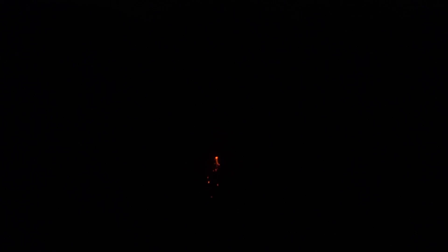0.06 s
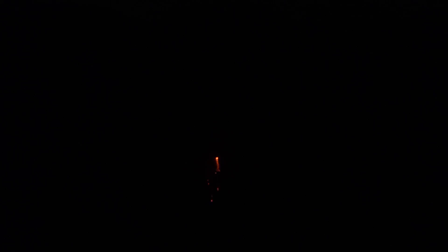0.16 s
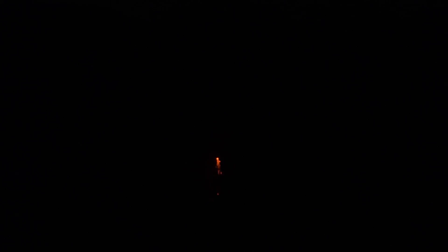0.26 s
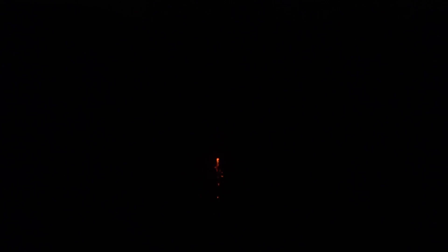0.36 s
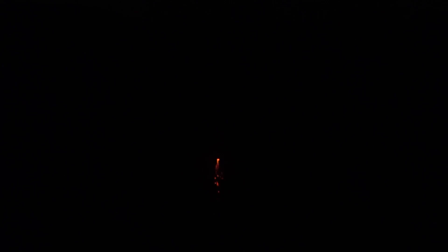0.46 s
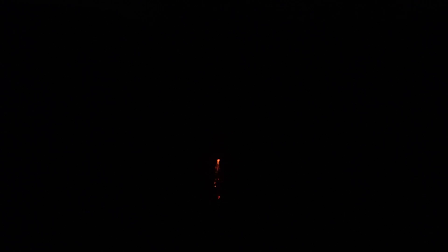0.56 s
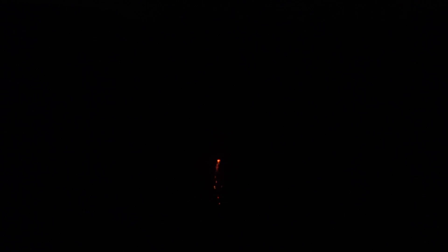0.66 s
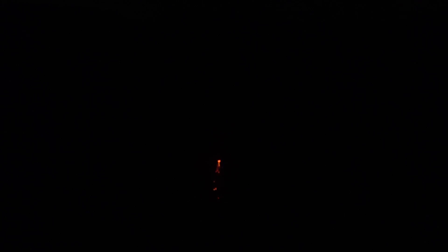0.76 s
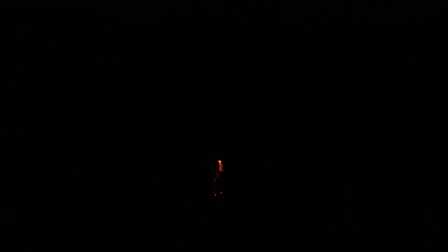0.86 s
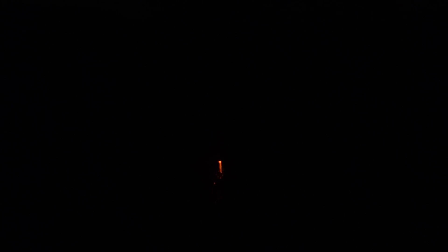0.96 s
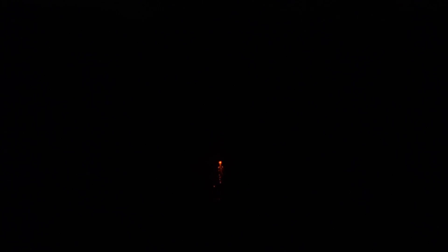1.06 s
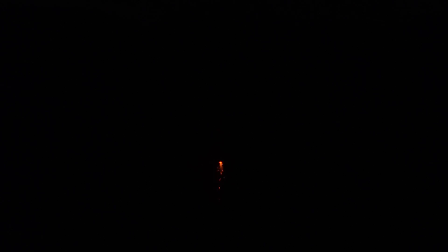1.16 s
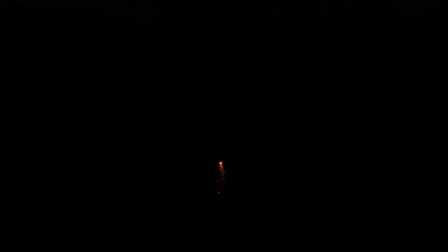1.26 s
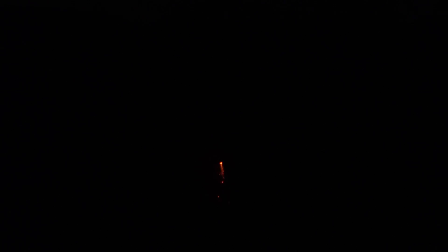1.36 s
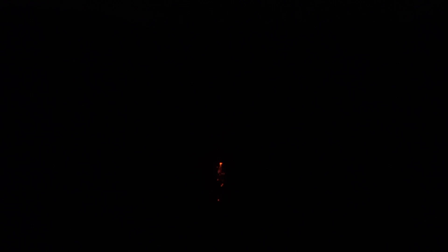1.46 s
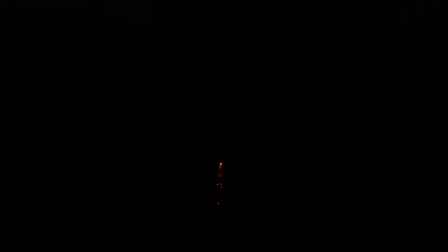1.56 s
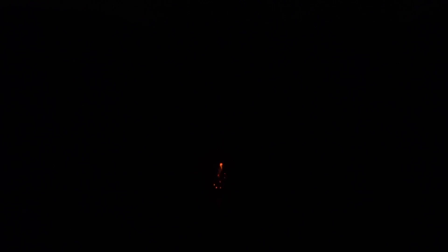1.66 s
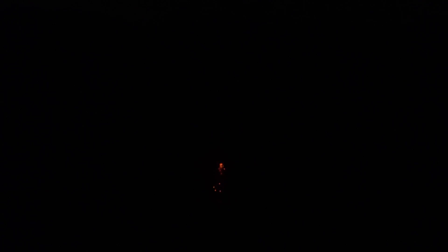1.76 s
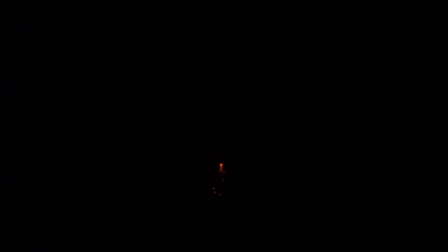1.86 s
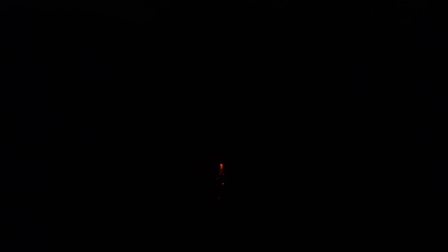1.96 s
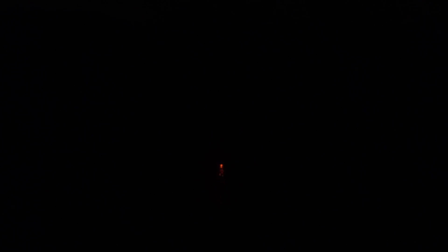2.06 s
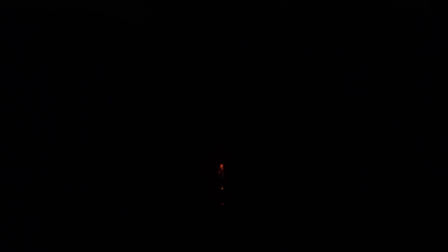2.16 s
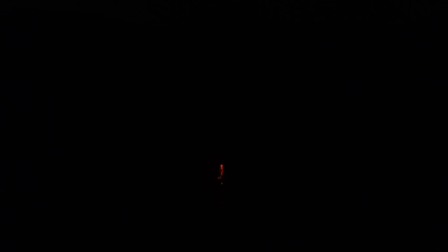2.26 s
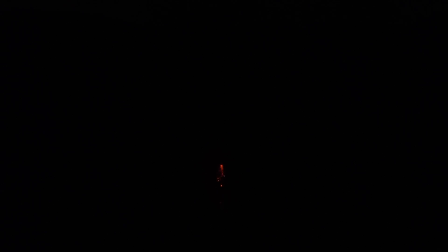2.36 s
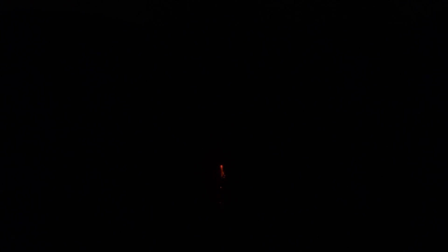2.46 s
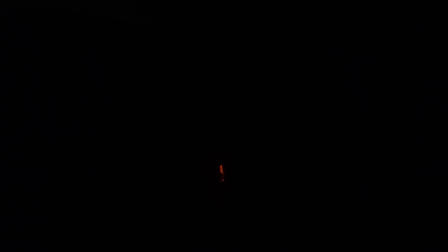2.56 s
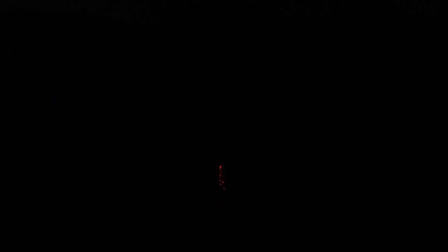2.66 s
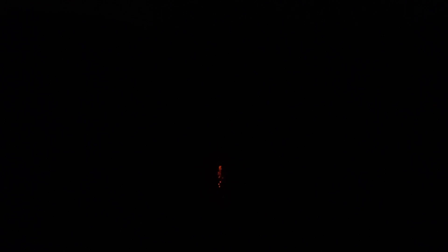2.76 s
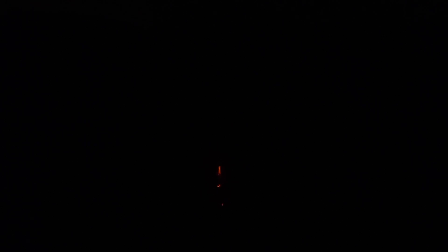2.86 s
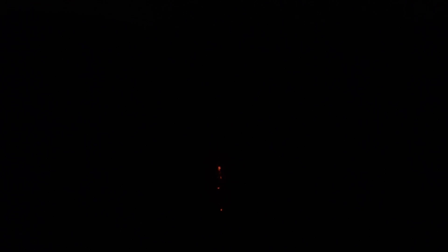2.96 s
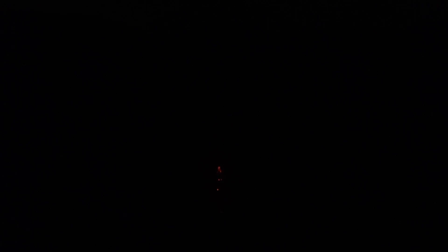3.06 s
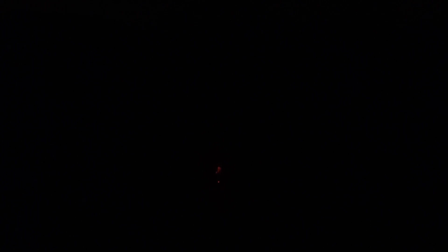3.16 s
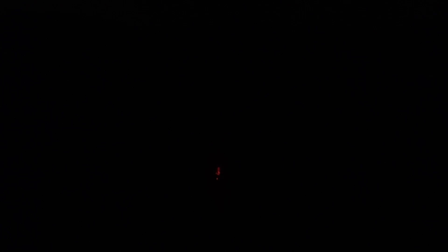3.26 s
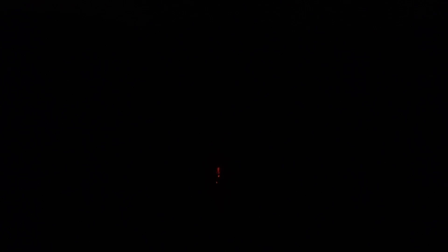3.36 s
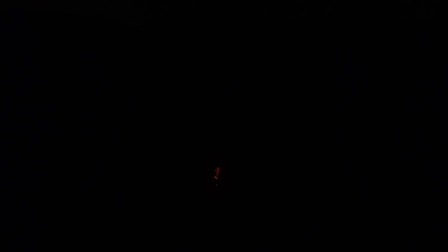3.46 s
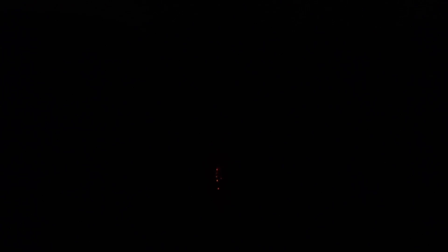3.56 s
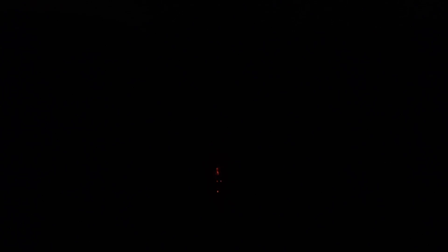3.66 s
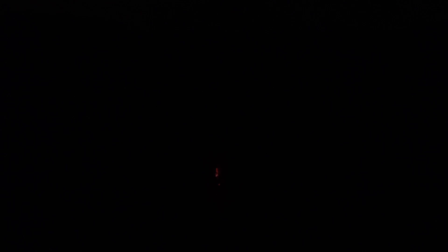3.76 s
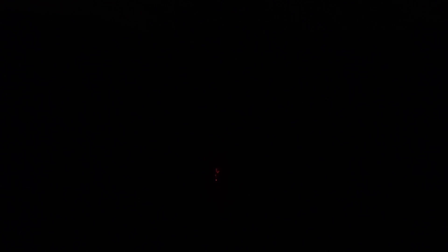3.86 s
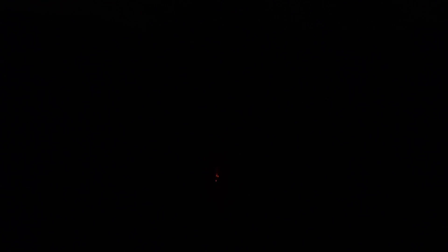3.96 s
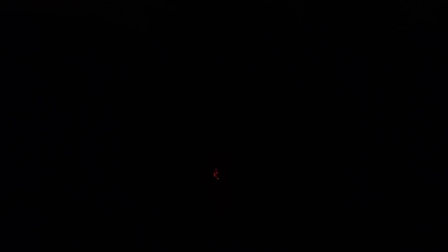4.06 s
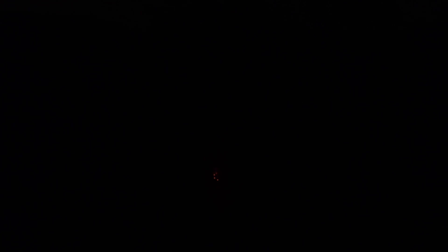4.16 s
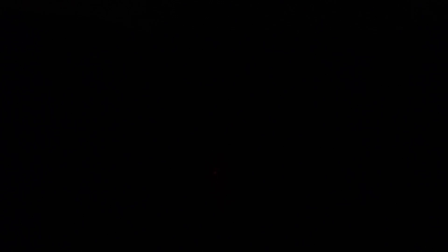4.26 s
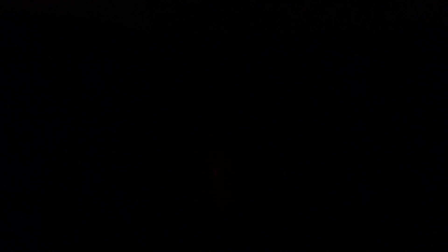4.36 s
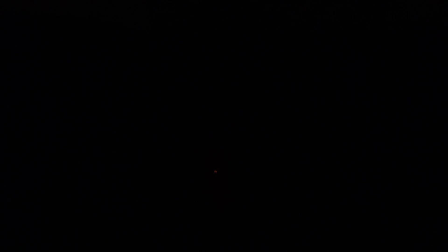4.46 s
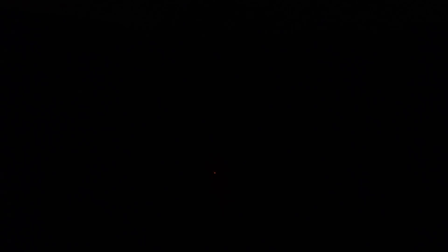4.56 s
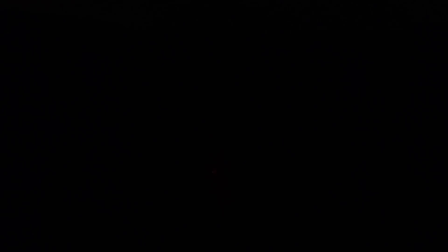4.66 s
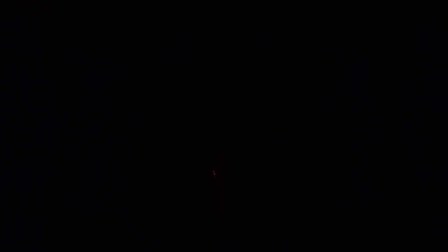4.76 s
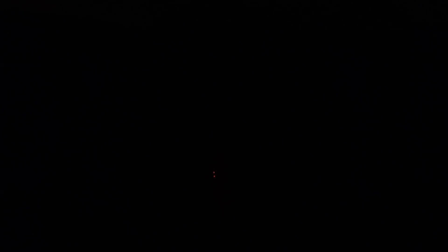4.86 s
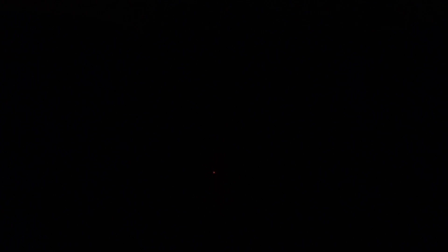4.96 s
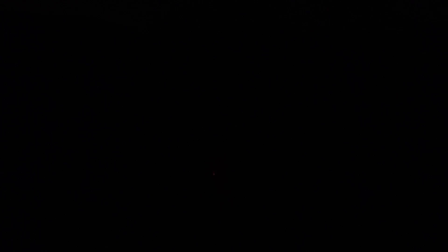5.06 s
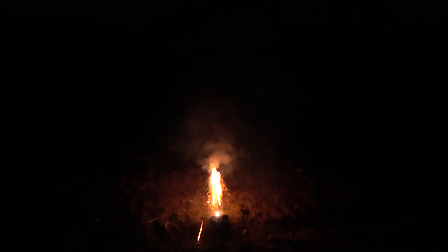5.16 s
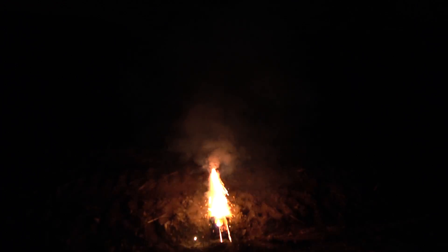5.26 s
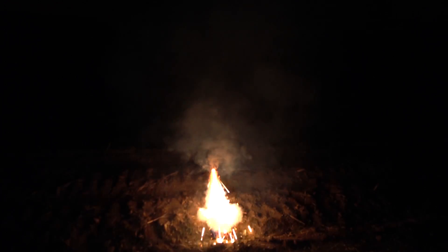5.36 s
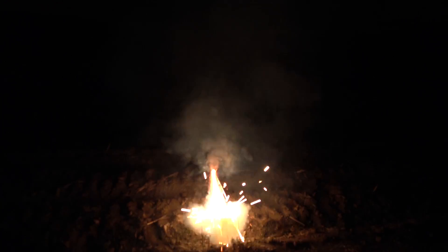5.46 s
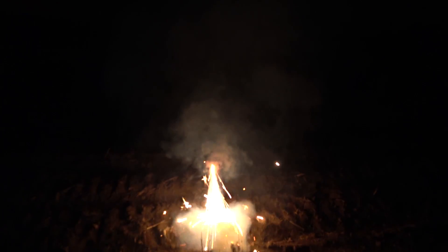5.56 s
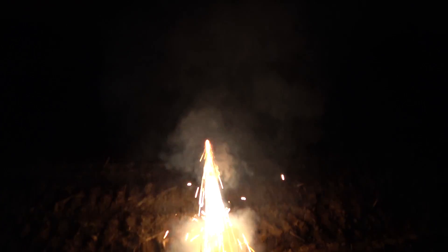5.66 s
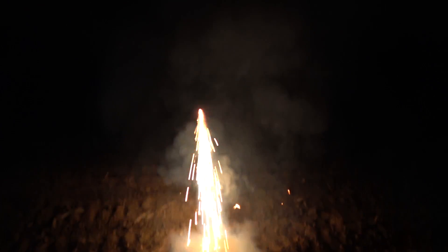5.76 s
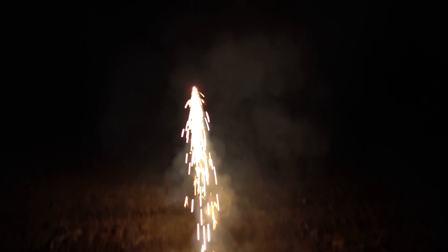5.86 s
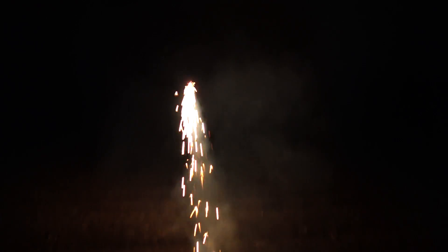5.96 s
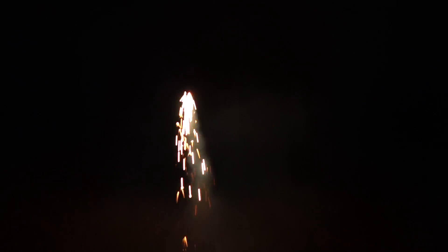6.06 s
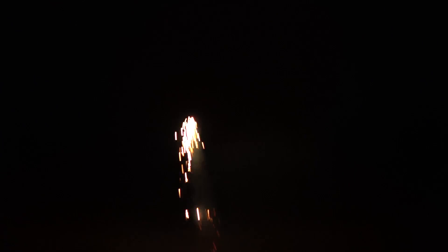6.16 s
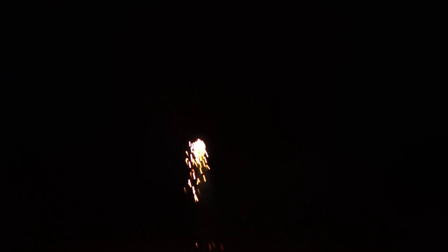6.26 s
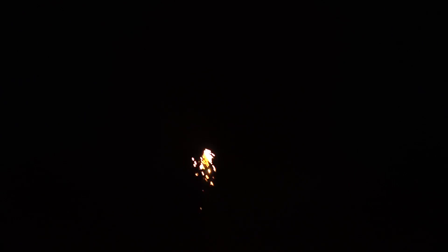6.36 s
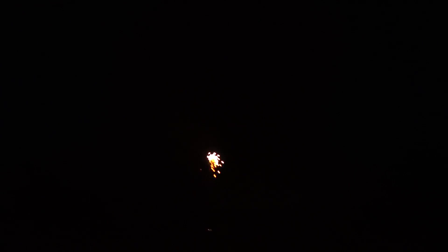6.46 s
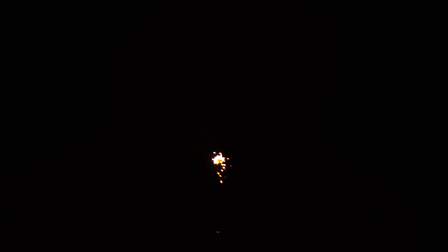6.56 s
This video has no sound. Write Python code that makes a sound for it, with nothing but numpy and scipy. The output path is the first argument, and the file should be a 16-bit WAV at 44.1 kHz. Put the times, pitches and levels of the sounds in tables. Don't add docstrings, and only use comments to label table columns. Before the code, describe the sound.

For the first five seconds a firework fuse burns quietly in an open field: a grainy, fluttering hiss in uneven puffs, brightest until about 2 s, then weaker and almost dying near 4.6 s. Small spits tick at 0.8, 1.2 and 2.2 s. Low breeze thumps softly at the close stereo microphone, and a faint distant drone fades. Around 5.15 s gas puffs up and a tiny squeak falls rapidly; at 5.25 s the plug pops with a short ring and sharp crackling hiss. By 5.4 s a piercing whistle locks in, loud and overloaded, dropping quickly from a high note, with a rough lower buzz and roaring jet. From 5.75 s the rocket lifts off; the bright hiss dulls, the whistle wavers, briefly recovers, and keeps sinking, rougher and breathier, until the end near 6.7 s, still sounding.

```python
import sys
import numpy as np
from scipy import signal
from scipy.fft import rfft, irfft, next_fast_len
from scipy.io import wavfile
from scipy.ndimage import map_coordinates

SR = 44100
rng = np.random.default_rng(int(sys.argv[2]) if len(sys.argv) > 2 else 0)


def wav_record(signal):
    frames = np.transpose(np.atleast_2d(signal))
    bounded = np.clip(frames, -1, 1)
    quanta = np.round(bounded * 32767).astype(np.int16)
    wavfile.write(sys.argv[1], SR, quanta)


def nominal_scale(level):
    x = np.asarray(level, float) / 20
    return 10 ** x


N = 291508

POP_S = 5.2515
LOCK_S = (5.345, 5.36)
PAIRING_S = (5.37, 5.53)
STUMBLE_S = (5.44, 5.47, 5.53, 5.57)
THRUST_S = (5.36, 5.7)
CLIMB_S = (5.757, 5.85)
EVEN_S = (6.04, 6.1)


def rocket():
    half = pulse_phase()
    return whistle(half) + jet(half)


def pulse_phase():
    ragged = flame()[0]
    unsteady = .02 * ragged * drift(50.0) + wobble()
    return np.pi * np.cumsum(tube_pitch() * (1 + unsteady)) / SR


def tube_pitch():
    start_hz, end_hz = 2400, 2670
    jump_s = (5.37, 5.377)
    settle_hz, excess_hz, settle_s, sag_hz_per_s = 1796, 579, .222, 190
    free = start_hz + (end_hz - start_hz) * (1 - np.exp(-since(POP_S) / .03))
    age = since(jump_s[1])
    settled = settle_hz + excess_hz * np.exp(-age / settle_s) - sag_hz_per_s * age
    return free + (settled - free) * ramp(*jump_s)


def wobble():
    young, stumbling, settled = .012, .014, .003
    depth = settled + young * (1 - ramp(*STUMBLE_S[2:])) + stumbling * swell(*STUMBLE_S)
    return depth * drift(60)


def flame():
    lock, paired, climb, even = burn_stages()
    stumble = swell(*STUMBLE_S)
    roughness = .03 * (1 - ramp(*STUMBLE_S[2:])) + .03 * stumble + .015 + .05 * climb + .06 * even
    ragged = .96 * (1 - lock) + lock * roughness
    crackle = .02 + .88 * np.exp(-since(5.32) / .09)
    locked = lock * (.95 - .15 * stumble) * np.exp(-since(5.78) / .17)
    alternation = paired * (1 - .85 * even)
    piped = 1 - np.exp(-since(LOCK_S[0]) / .17)
    return ragged, crackle, locked, alternation, piped


def burn_stages():
    return ramp(*LOCK_S), ramp(*PAIRING_S), ramp(*CLIMB_S), ramp(*EVEN_S)


def whistle(half):
    # (time [s], tone level [dB])
    strength = [
        (5.26, -30),
        (5.36, -24.5),
        (5.38, -20),
        (5.5, -13),
        (5.72, -13.5),
        (5.8, -17),
        (5.93, -15),
        (5.986, -20),
        (6.04, -16),
    ]
    # (multiple of half the pitch, level [dB])
    orders = [(1, -10), (2, 0), (3, -12.5), (4, -19.5), (5, -15.5), (6, -24.5), (7, -13), (8, -33),
              (9, -14.5), (10, -38)]
    tone_db, on = in_time(strength)
    half_db, over_db, band_db = whistle_levels()
    ragged, _, locked, alternation, _ = flame()
    levels = dict(orders)
    clear = np.sqrt(1 - ragged)
    note = np.sqrt(2) * clear * np.sin(2 * half) + np.sqrt(ragged) * noise_band(2 * half, 110.0)
    tone = nominal_scale(tone_db) * note
    for k, db in orders:
        if k == 2:
            continue
        level = alternation * nominal_scale(half_db - levels[1]) if k % 2 else nominal_scale(over_db - levels[4])
        steady = np.where(k > 4, locked ** 3 * nominal_scale(9 - 9 * alternation), 1)
        flicker = nominal_scale(db + 0.69 * drift(120.0))
        tone = tone + np.sqrt(2) * clear * steady * level * flicker * np.sin(k * half + 0.7 * k)
    under = noise_band(1.74 * half, 75.0) + nominal_scale(-33) * noise_band(4.5 * half, 130.0)
    return on * (tone + nominal_scale(band_db) * under)


def whistle_levels():
    lock, paired, climb, even = burn_stages()
    half_db = -28 - 12 * (1 - ramp(LOCK_S[1], PAIRING_S[1])) - 3 * climb - 9 * even
    half_db = half_db + 1.5 * drift(14.0)
    over_db = -31.5 - 9 * (1 - lock) + 5.5 * climb - 13 * since(LOCK_S[1])
    band_db = -42 + 10.5 * lock * (1 - paired) + 7.5 * even
    band_db = band_db + 8 * ramp(CLIMB_S[1] - .15, CLIMB_S[1] + .05)
    slips_s, width_s = (5.575, 5.705, 5.845, 5.89, 5.945, 6.035), .005
    slips = sum(np.exp(-((np.arange(N) / SR - s) / width_s) ** 2) for s in slips_s)
    return half_db - 14 * slips, over_db, band_db + 9 * slips


def jet(half):
    # (frequency [Hz], density [dB per Hz])
    thud_hue = [(130, -29), (190, -9.5), (250, 2), (330, 1.5), (450, -41)]
    rumble_hue = [(210, -50), (350, -14.5), (714, -11), (867, -10.5), (1010, -11.5), (1660, -7),
                  (2690, -14), (3260, -17.5), (4000, -29.5), (5200, -33), (8800, -120)]
    hiss_hue = [(900, -8), (2300, -1.5), (4000, -1.5), (8000, -2), (10000, -4.5), (16700, -11.5)]
    _, crackle, locked, alternation, piped = flame()
    thud, rumble, hiss_db, top_db = jet_levels()
    lit = ramp(POP_S - .007, POP_S) ** 3
    rumble = rumble * nominal_scale(11.5 + 1.0 * drift(38.0)) * colour(tube_noise(half, 0), rumble_hue)
    thud = thud * colour(rng.standard_normal(N), thud_hue)
    through_tube = np.sqrt(piped) * tube_noise(half, locked * alternation)
    gas = through_tube + np.sqrt(1 - piped) * rng.standard_normal(N)
    hiss = np.sqrt(1 - crackle) * colour(gas, hiss_hue) + np.sqrt(crackle) * cracks()
    body = signal.sosfilt(signal.butter(4, 10000, "low", fs=SR, output="sos"), hiss)
    top = signal.sosfilt(signal.butter(4, 10000, "high", fs=SR, output="sos"), hiss)
    air = signal.sosfiltfilt(signal.butter(3, 13500, "high", fs=SR, output="sos"), top)
    top = top - air * (1 - nominal_scale(-22 * since(6.05)))
    hiss = nominal_scale(0.37 * drift(31.0)) * (nominal_scale(hiss_db) * body + nominal_scale(top_db + 2.5) * top)
    return lit * (thud + rumble + hiss)


def jet_levels():
    climb, late = ramp(*CLIMB_S), ramp(CLIMB_S[1], N / SR)
    thrust_s, full_s = THRUST_S
    pop = nominal_scale(-60 * since(POP_S - .006) / .029)
    thud_db = -54 - 15 * (1 - ramp(thrust_s, thrust_s + 0.062)) + 15 * np.minimum(since(thrust_s), .95)
    thud = np.hypot(nominal_scale(thud_db), nominal_scale(-36) * pop)
    lift_db = 3.5 * swell(5.74, 5.82, 5.87, 5.95)
    rumble_db = -41 - 15 * (1 - ramp(thrust_s, thrust_s + 0.15)) + lift_db
    rumble = np.hypot(nominal_scale(rumble_db), nominal_scale(-17.5) * pop)
    thud, rumble = [nominal_scale(1.3 * drift(8.6)) * layer for layer in (thud, rumble)]
    hiss_db = -29 + 11.5 * np.exp(-since(POP_S) / 0.14) + 2.8 * ramp(5.58, full_s)
    hiss_db = hiss_db - 11.5 * climb - 5 * late
    top_db = -34.5 + 7.0 * np.exp(-since(POP_S + .02) / .06) + 12.5 * ramp(5.35, full_s)
    top_db = top_db - 20.5 * climb - 2 * late
    falter_db = -3 * swell(5.42, 5.455, 5.47, 5.5) + 2.5 * swell(6.25, 6.32, 6.4, 6.44)
    return thud, rumble, hiss_db + falter_db, top_db + falter_db


def tube_noise(half, locked):
    # (multiple of half the pitch, width [multiples], level [dB])
    resonances = [(.66, .2, 3), (1.35, .4, -4), (3.25, .5, -8), (3.8, .9, 7), (5, .9, -5), (6, .9, 5),
                  (7.1, .8, 10), (9.1, .9, 8), (14.4, 1.0, 6), (16.5, 1.2, 8)]
    size = 64
    place = half / (2 * np.pi) * size
    count = next_fast_len(int(place[-1]) + 2)
    order = np.fft.rfftfreq(count, 1 / size)
    tube_db = sum(db / (1 + (2 * (order - k) / width) ** 2) for k, width, db in resonances)
    shaped = rfft(rng.standard_normal(count)) * nominal_scale(tube_db)
    memory = .8 / (1 + (order / 14) ** 4)
    comb = 1 / (1 - memory * np.exp(-2j * np.pi * order))
    loose, tight = [map_coordinates(rms_one(irfft(shaped * c, count)), [place], order=3) for c in (1, comb)]
    return np.sqrt(1 - locked) * loose + np.sqrt(locked) * tight


def cracks():
    # (frequency [Hz], level [dB], t60 [s])
    detonation = [(6630, 0.5, .0014), (8200, -2, 0.00085), (2560, -11.5, 0.0043), (12500, -1, .0004)]
    shortest_ms, mean_extra_ms, echo_ms = .9, .9, .68
    draws = rng.random((9000, 2))
    gaps_ms = shortest_ms - mean_extra_ms * np.log(1 - draws[:, 0])
    at = (np.cumsum(gaps_ms) * SR / 1000).astype(int)
    clicks = np.zeros(N)
    clicks[at[at < N]] = nominal_scale(7 * draws[at < N, 1])
    shape = sum(nominal_scale(db) * ring(0, hz, t60)[:400] for hz, db, t60 in detonation)
    rung = signal.oaconvolve(clicks, shape)[:N]
    rung = signal.sosfilt(signal.butter(4, 1500, "high", fs=SR, output="sos"), rung)
    return rms_one(rung + .5 * np.roll(rung, round(echo_ms * SR / 1000)))


def ignition():
    # (time [s], pitch [Hz], tone level [dB])
    squeak = [
        (5.13, 2502, -52),
        (5.156, 2430, -48),
        (5.167, 2360, -39),
        (5.181, 2090, -30),
        (5.188, 1840, -17),
        (5.193, 1677, -19),
        (5.198, 1250, -33.5),
        (5.206, 777, -28),
        (5.24, 690, -75),
    ]
    # (start [s], full [s], held until [s], gone [s], level [dB], dull above [Hz])
    puffs = [
        (5.12, 5.193, 5.25, 5.256, -31, 9000),
        (5.148, 5.181, 5.195, 5.225, -26, 3990),
        (5.195, 5.22, 5.256, 5.27, -30, 704.3),
    ]
    # (frequency [Hz], level [dB], t60 [s])
    modes = [(5510, -1, 0.024), (6030, -4, 0.018), (2370, -12, 0.055), (8500, -34, .012)]
    hz, tone_db, on = in_time(squeak)
    phase = 2 * np.pi * np.cumsum(hz) / SR
    tone = np.sin(phase) + .32 * np.cos(2 * phase) + .5 * noise_band(phase, 250.0)
    tone = on * (1 - ramp(POP_S - .01, POP_S)) * nominal_scale(tone_db + 3.5) * tone
    gas_hue = [(60, -17), (400, -18.0), (2000, -6), (5000, -12.0), (16000, -9.5)]
    raw_gas = colour(grains(3000, 1.1), gas_hue)
    gas = 0
    for *times, db, top_hz in puffs:
        dull = signal.sosfilt(signal.butter(2, top_hz, fs=SR, output="sos"), raw_gas)
        gas = gas + nominal_scale(db) * swell(*times) ** 2 * rms_one(dull)
    pop = sum(ring(POP_S, hz, t60) * nominal_scale(db) for hz, db, t60 in modes)
    return tone + gas + nominal_scale(-3.5) * pop


def fuse():
    # (time [s], sizzle level [dB])
    vigour = [(0.0, -48), (1.0, -46), (1.41, -45.5), (1.46, -47.5), (1.7, -46), (2.07, -47.5), (2.12, -51),
              (2.6, -48), (3.0, -52.5), (3.12, -50), (3.35, -52), (3.42, -47), (3.66, -50), (3.8, -49),
              (4.04, -54), (4.52, -52.5), (4.62, -56), (5.13, -54)]
    # (frequency [Hz], density [dB per Hz])
    body_hue = [(150, -33), (250, -5), (362, -19.5), (393, -13), (590, -6.5), (1010, 1), (1280, -2.5),
                (1640, -2), (2090, -8.5), (2630, -7), (2990, -13.5), (3280, -10), (4000, -25), (5200, -63),
                (8800, -120)]
    sizzle_hue = [(2060, -22), (3500, -27.5), (3640, -6.5), (3910, -6.5), (4590, -8), (8420, -8.5),
                  (9580, -12), (12600, -12.5), (16400, -19)]
    early_hue = [(4000, -18), (5000, -1), (6000, 0), (7500, -14)]
    later_hue = [(4800, -28), (6000, -4), (7200, 1), (9500, -10), (15000, -13)]
    # (time [s], peak level [dB], ring [Hz], t60 [s])
    spits = [
        (.8285, -21, 450, .007),
        (.829, -26, 1500, .004),
        (1.179, -23, 550, .007),
        (2.174, -20, 1100, .005),
        (2.174, -27, 5500, .002),
        (5.0759, -31, 11000, .001),
    ]
    # (delay [ms], pressure share)
    echoes = [(1.193, .14), (1.268, -.14), (1.382, -.19), (1.575, .2), (1.6, -.2), (1.672, -.11),
              (1.814, .12), (1.95, -.07), (3.116, -.1)]
    sizzle_db, _ = in_time(vigour)
    body_db = -18 + 0.46 * sizzle_db
    puffs = 0.38 * drift(18.0) + .5 * drift(24.0)
    body = nominal_scale(body_db + 0.56 * puffs) * colour(rng.standard_normal(N), body_hue)
    sizzle = colour(rng.standard_normal(N) + 0.46 * grains(4000, 3.5), sizzle_hue)
    burning = np.arange(N) < POP_S * SR
    direct = (body + nominal_scale(sizzle_db + 1.73 * puffs) * sizzle) * burning
    direct = direct + sum(nominal_scale(db) * ring(s, hz, t60) for s, db, hz, t60 in spits)
    risen = ramp(.3, 1.6)
    flare = np.sqrt(1 - risen) * colour(rng.standard_normal(N), early_hue)
    flare = flare + np.sqrt(risen) * colour(rng.standard_normal(N), later_hue)
    flare = nominal_scale(-49.5 + 1.6 * puffs) * swell(-.4, .6, 1.42, 2.12) * flare
    hz = np.fft.rfftfreq(N, 1 / SR)
    weak_lows = 1 / (1 + (2300 / (hz + 1)) ** 4)
    returns = sum(share * np.exp(-2j * np.pi * hz * ms / 1000) for ms, share in echoes)
    return irfft(rfft(direct) * (1 + weak_lows * returns), N) + flare


def breeze():
    # (frequency [Hz], density [dB per Hz])
    breeze_hue = [(18, -3), (30, 5.5), (42, -3.5), (62, 4), (85, -7), (120, -31)]
    drone_hue = [(70, -21), (100, 1.5), (145, -4.5), (220, -2.5), (280, -14), (380, -14)]
    wind, drone = background_levels()
    gust = nominal_scale(1.14 * drift(12.5))
    shared, left, right = [wind * nominal_scale(-2.0) * colour(rng.standard_normal(N), breeze_hue) for _ in "slr"]
    far, far_left, far_right = [drone * nominal_scale(2.0) * colour(rng.standard_normal(N), drone_hue) for _ in "slr"]
    rising_db = np.interp(np.arange(N) / SR, [0, 3.6, 4.6], [-9, -8, 0])
    buffet = colour(rng.standard_normal(N), [(15, -11), (28, -3), (40, -7), (55, -22)])
    buffet = buffet * wind * nominal_scale(rising_db + 2.7 * drift(1.5))
    left_port = 0.85 * shared + 0.62 * left + 0.53 * far + 0.38 * far_left + buffet
    right_port = 0.68 * shared + 0.19 * right + far + 0.62 * far_right
    return gust * np.array([left_port, right_port])


def background_levels():
    # (time [s], level [dB], half width [s])
    gusts = [
        (.15, 5, .06),
        (1.01, 1, .06),
        (3.55, 3.5, .12),
        (4.2, 1.5, 0.12),
        (4.6, 3.5, .05),
        (5.05, 4, 0.22),
    ]
    t = np.arange(N) / SR
    duck_s = 0.074
    duck_db = -38 * ramp(POP_S, POP_S + duck_s)
    breeze_db = -44 + sum(db * np.exp(-((t - s) / width) ** 2) for s, db, width in gusts) + duck_db
    drone_db = -46.5 - 1.0 * t - 5.5 * ramp(4.3, POP_S) + duck_db
    whoomph = nominal_scale(-38.5 - 62 * ramp(POP_S + 0.008, POP_S + duck_s)) * ramp(5.13, 5.21)
    blast_db = -49.5 - 14.36 * (1 - ramp(*THRUST_S)) - 29 * ramp(CLIMB_S[0], CLIMB_S[1] + 0.073)
    blast = nominal_scale(blast_db) * ramp(THRUST_S[0], THRUST_S[0] + .1)
    wind = np.hypot(nominal_scale(breeze_db), nominal_scale(-9) * blast)
    return wind, np.sqrt(nominal_scale(drone_db) ** 2 + whoomph ** 2 + blast ** 2)


def rms_one(x):
    return x / np.sqrt(np.mean(np.abs(x) ** 2) + 1e-20)


def in_time(rows):
    s, *columns = np.transpose(rows)
    t = np.arange(N) / SR
    return [np.interp(t, s, c) for c in columns] + [np.clip((t - s[0]) / 0.0066, 0, 1)]


def ramp(start_s, end_s):
    return np.clip((np.arange(N) / SR - start_s) / (end_s - start_s), 0, 1)


def swell(start_s, full_s, held_s, gone_s):
    return ramp(start_s, full_s) * (1 - ramp(held_s, gone_s))


def since(s):
    return np.maximum(np.arange(N) / SR - s, 0)


def at_hz(points, hz):
    point_hz, point_db = np.transpose(points)
    return np.interp(np.log(hz + 1), np.log(point_hz), point_db)


def colour(x, points):
    hz = np.fft.rfftfreq(N, 1 / SR)
    inside = (hz > points[0][0]) & (hz < points[-1][0])
    return rms_one(irfft(rfft(x) * nominal_scale(at_hz(points, hz)) * inside, N))


def drift(rate_hz):
    r = np.exp(-2 * np.pi * rate_hz / SR)
    return rms_one(signal.lfilter([1], [1, -2 * r, r * r], rng.standard_normal(N + SR))[SR:])


def noise_band(phase, width_hz):
    return drift(width_hz) * np.sin(phase) + drift(width_hz) * np.cos(phase)


def grains(per_s, spread_db):
    sizes = nominal_scale(spread_db * np.minimum(rng.exponential(1, N), 5)) * rng.choice([-1, 1], N)
    return rms_one(sizes * (rng.random(N) < per_s / SR))


def ring(at_s, hz, t60):
    out, start = np.zeros(N + SR), int(np.ceil(at_s * SR))
    t = (start + np.arange(int(2 * t60 * SR))) / SR - at_s
    out[start:start + len(t)] = np.sin(2 * np.pi * hz * t) * nominal_scale(-60 * t / t60)
    return out[:N]


def spread(x, extra_db):
    # (frequency [Hz], side minus mid [dB])
    side_db = [(60, -55), (150, -23), (380, -11), (950, -7.5), (2380, -14.5), (5980, -9.5), (15000, -20)]
    hz = np.fft.rfftfreq(N + SR, 1 / SR)
    tail = rms_one(rng.standard_normal(6400) * nominal_scale(-np.arange(6400) / 200)) / 80
    scatter = rfft(tail, N + SR) * nominal_scale(at_hz(side_db, hz) + extra_db)
    side = irfft(rfft(x, N + SR) * scatter, N + SR)[:N]
    return np.array([x + side, x - side])


def scene():
    return spread(ignition() + rocket(), extra_db=-8.0) + spread(fuse(), extra_db=0) + breeze()


def top_cut(x):
    return signal.sosfilt(signal.butter(12, 16510, fs=SR, output="sos"), x)


def record(dry):
    ceiling = .33 + .08 * np.exp(-since(POP_S) / .1) + .2 * ramp(5.86, 6.7)
    held = dry / (1 + (dry / ceiling) ** 8) ** (1 / 8)
    cut = signal.sosfiltfilt(signal.ellip(10, .3, 50, 16450, fs=SR, output="sos"), held)
    return top_cut(cut)


dry = scene()
out = record(dry)
wav_record(out)
```